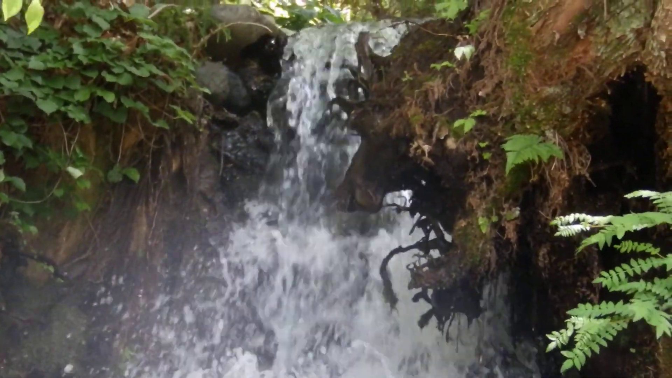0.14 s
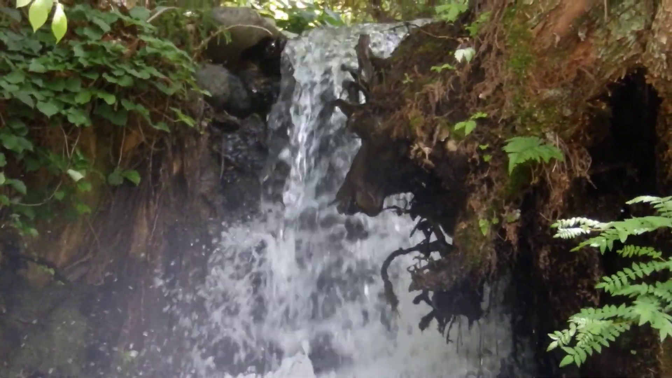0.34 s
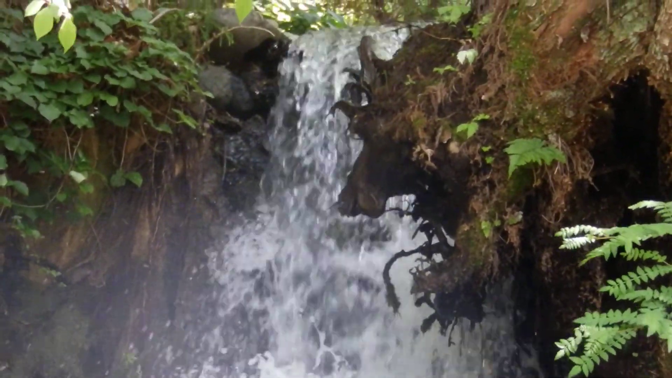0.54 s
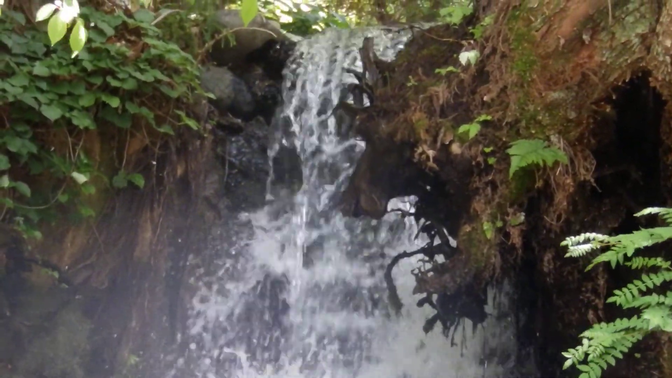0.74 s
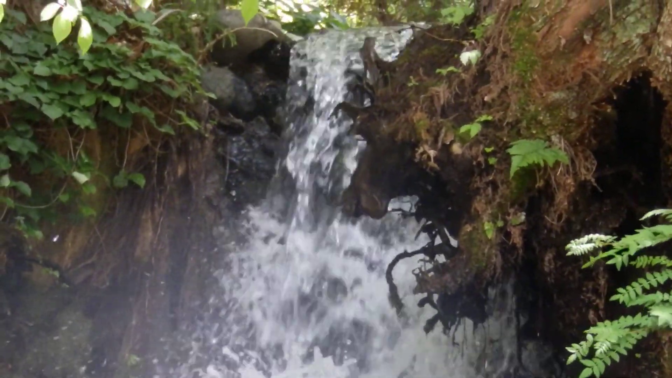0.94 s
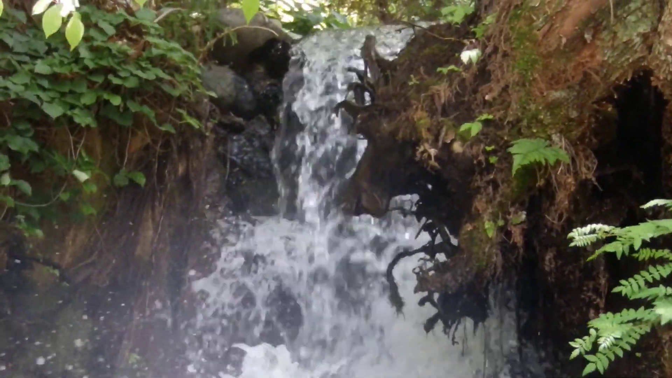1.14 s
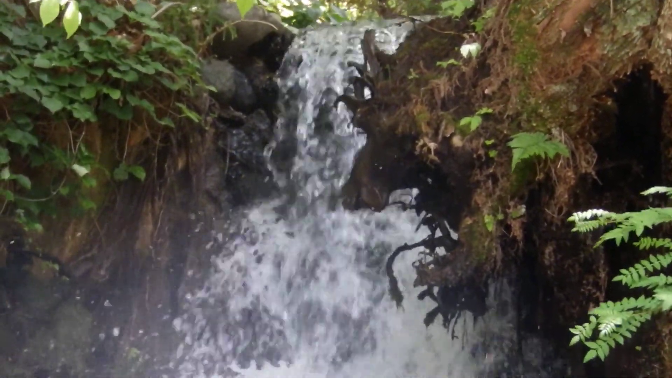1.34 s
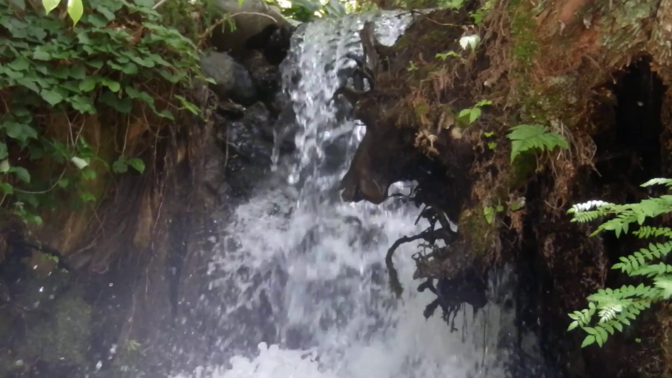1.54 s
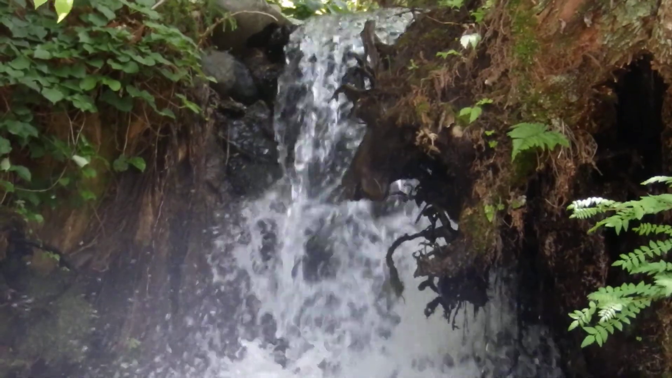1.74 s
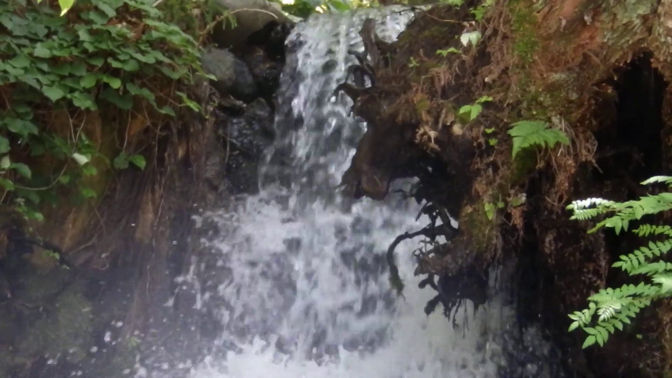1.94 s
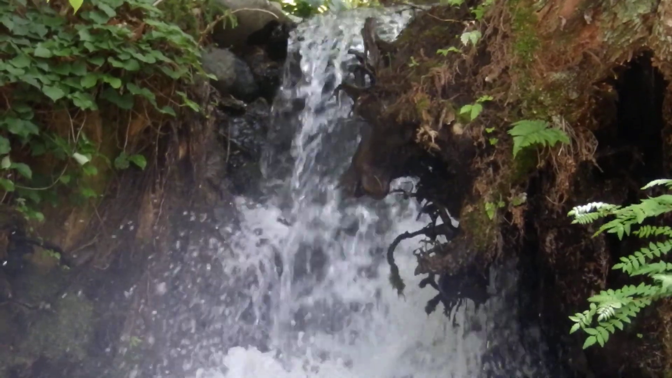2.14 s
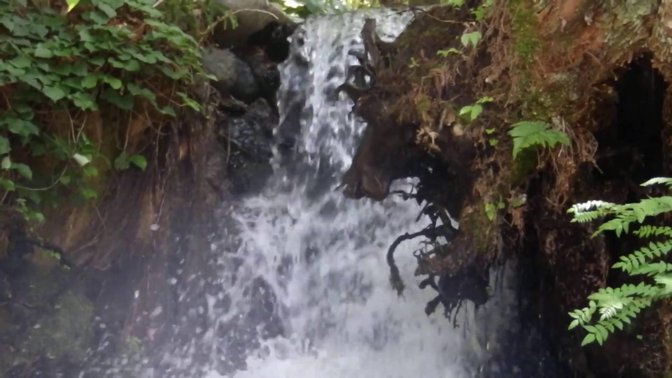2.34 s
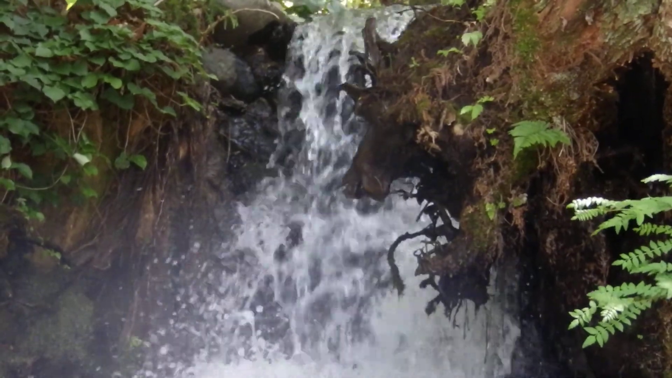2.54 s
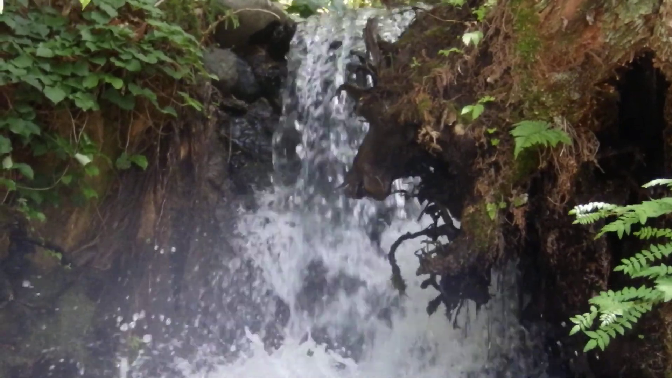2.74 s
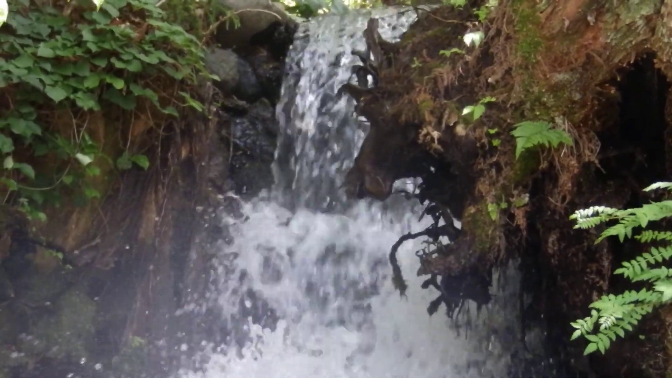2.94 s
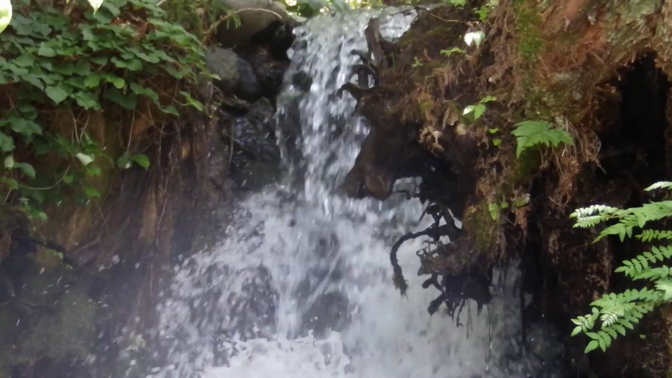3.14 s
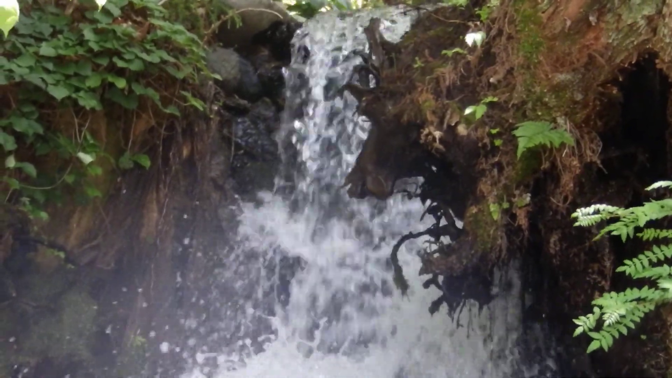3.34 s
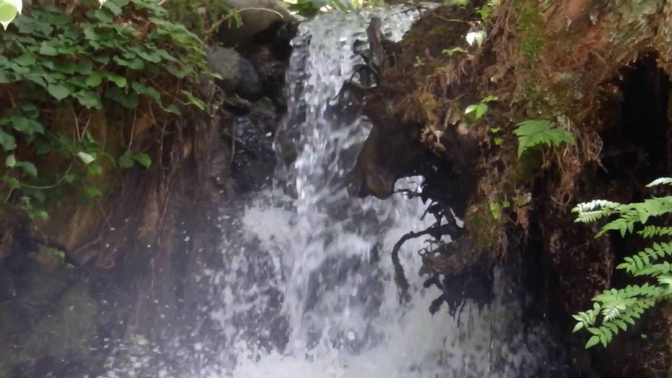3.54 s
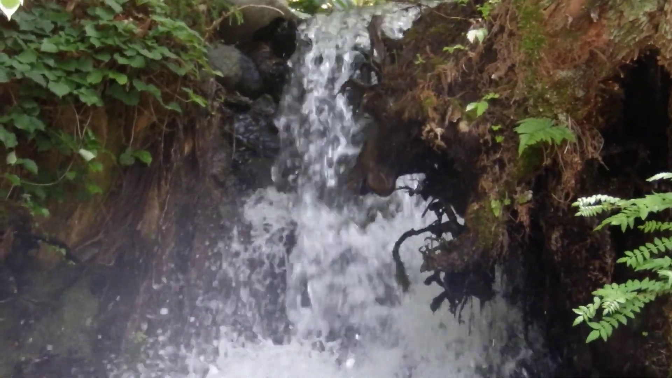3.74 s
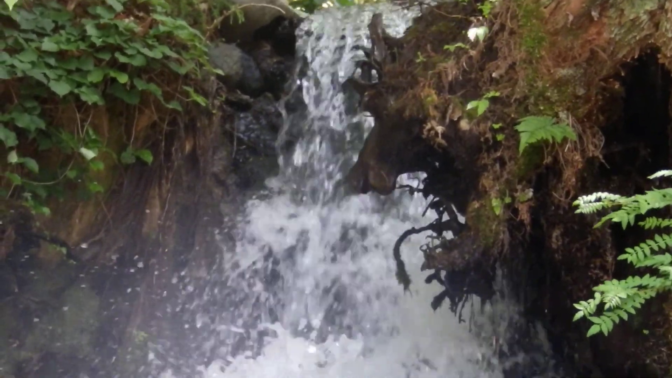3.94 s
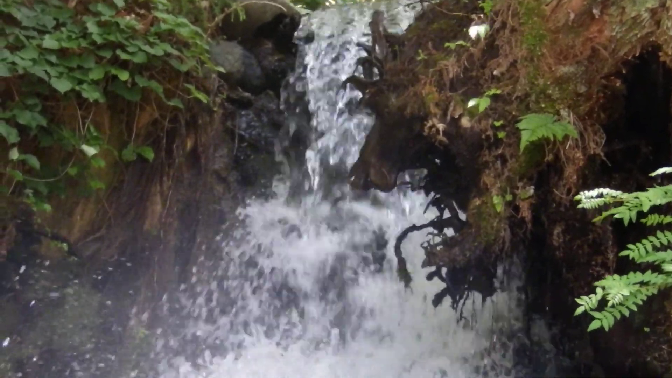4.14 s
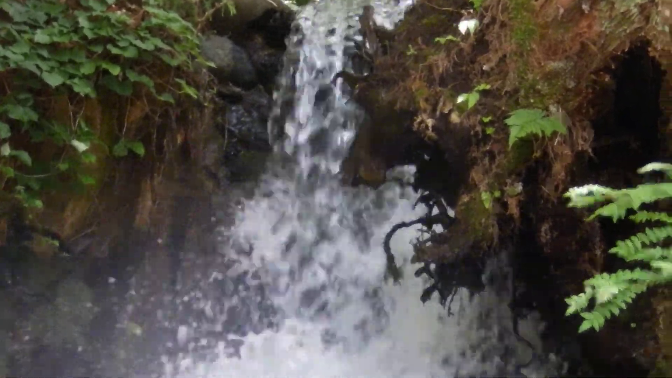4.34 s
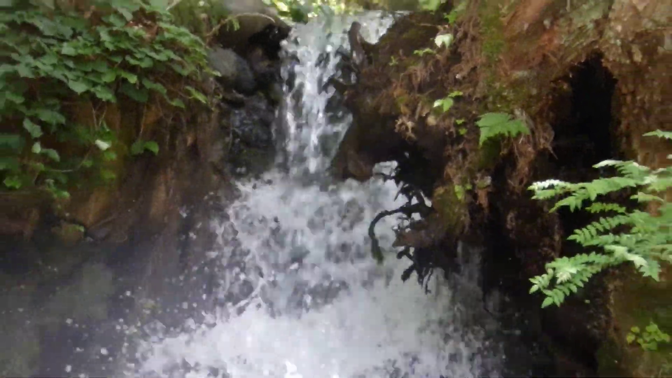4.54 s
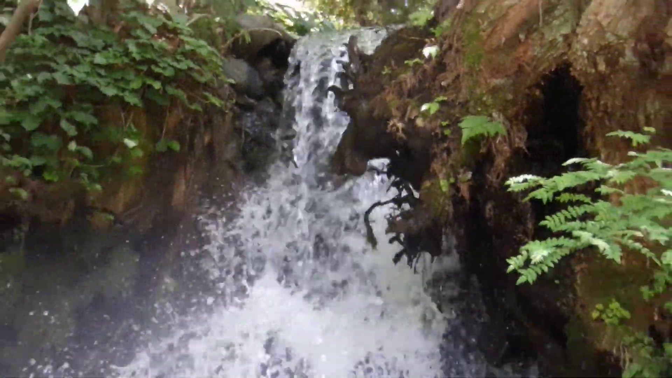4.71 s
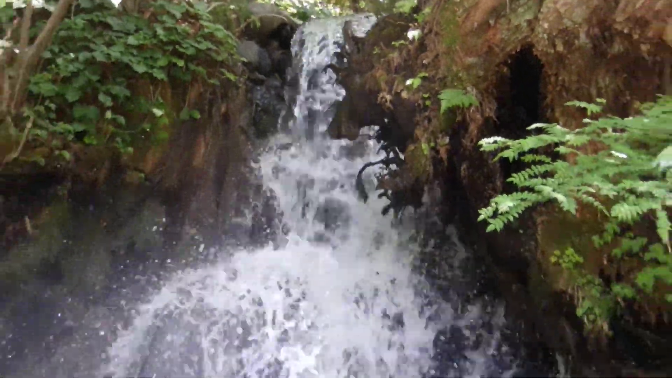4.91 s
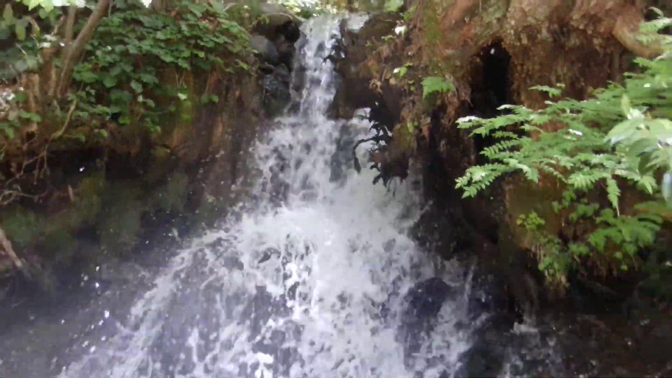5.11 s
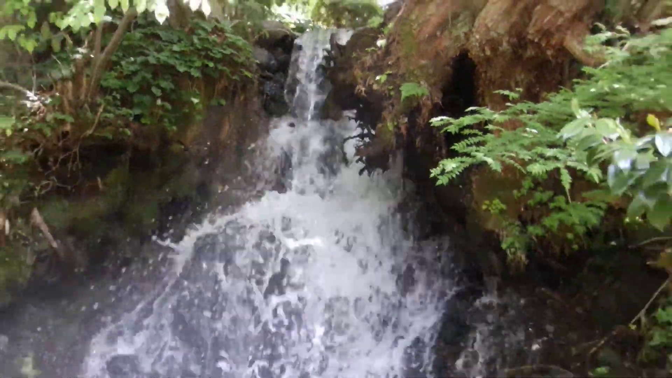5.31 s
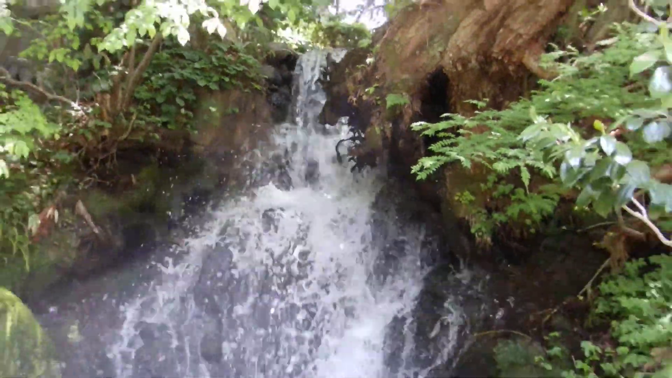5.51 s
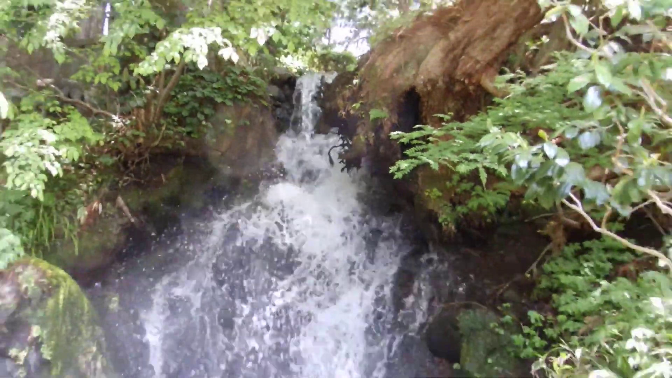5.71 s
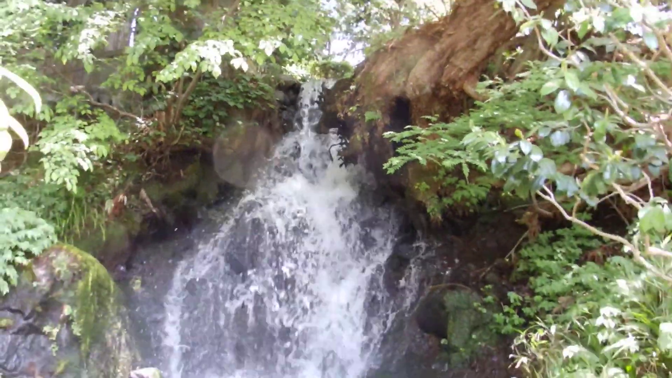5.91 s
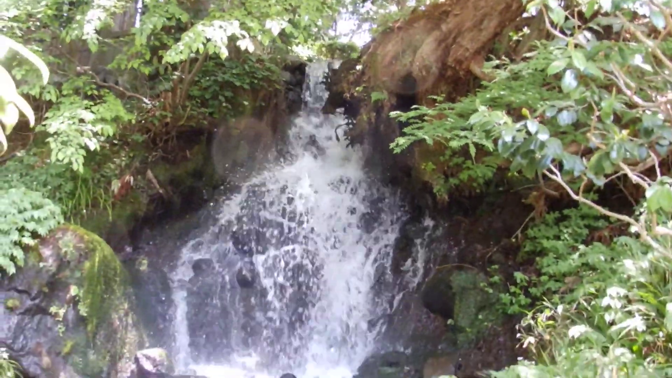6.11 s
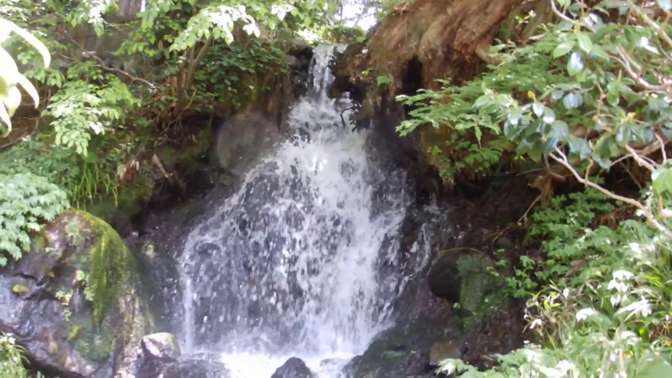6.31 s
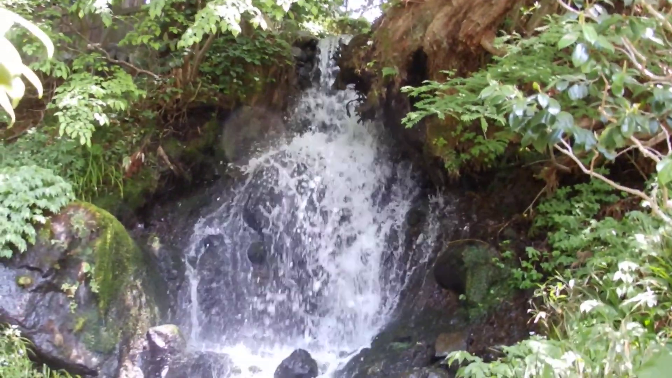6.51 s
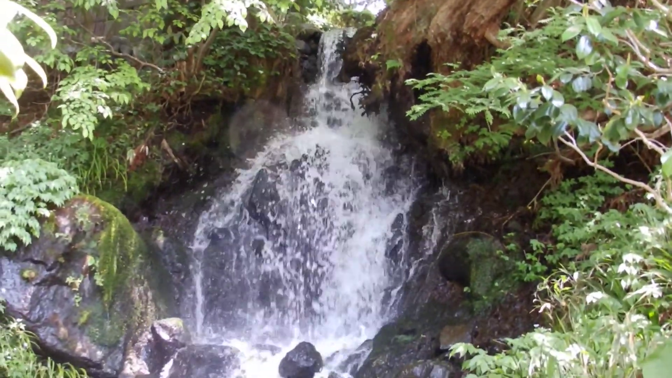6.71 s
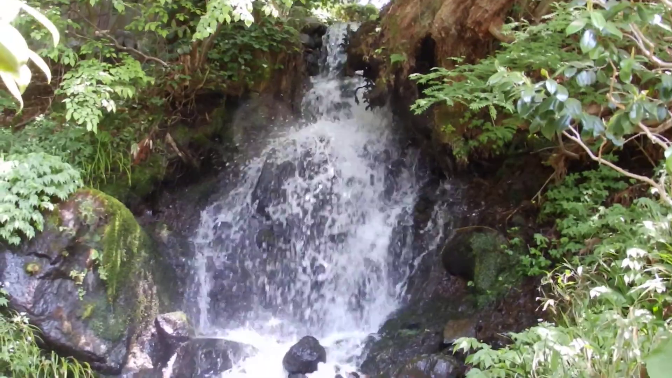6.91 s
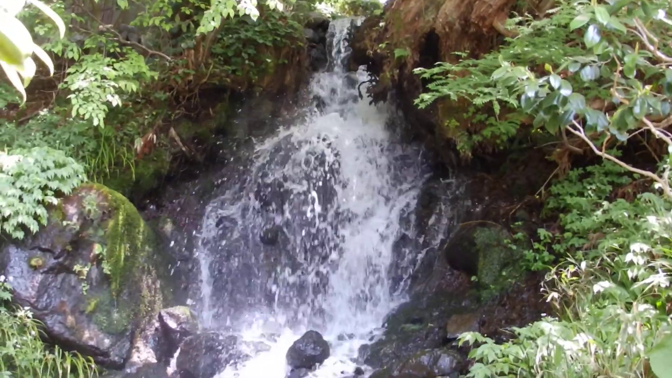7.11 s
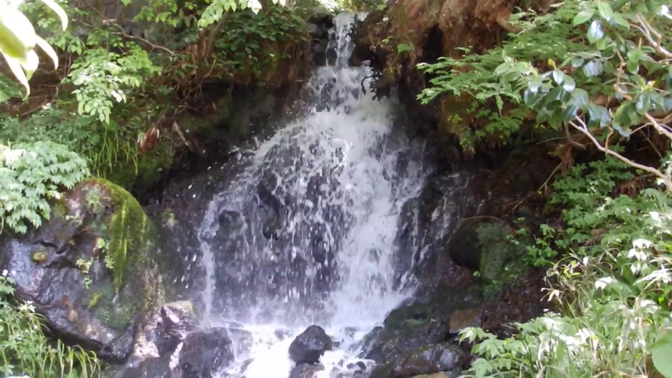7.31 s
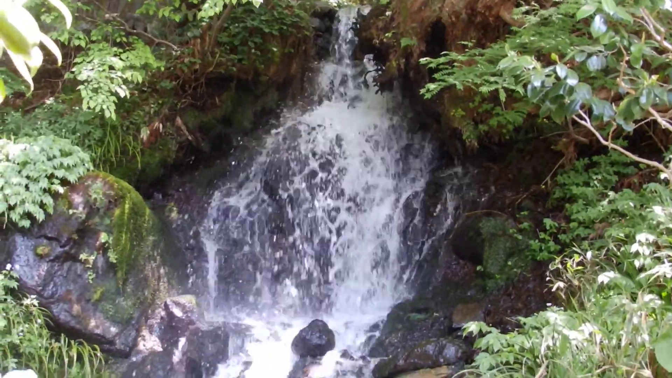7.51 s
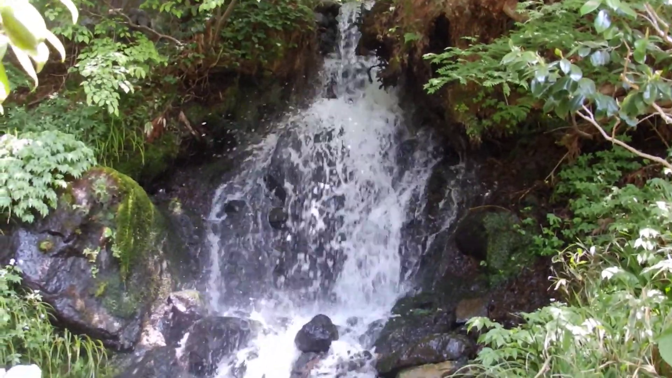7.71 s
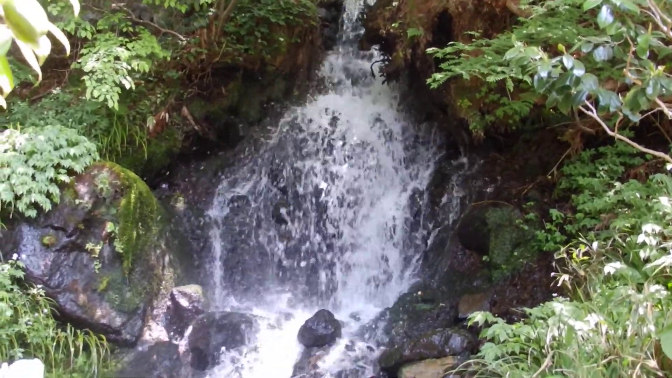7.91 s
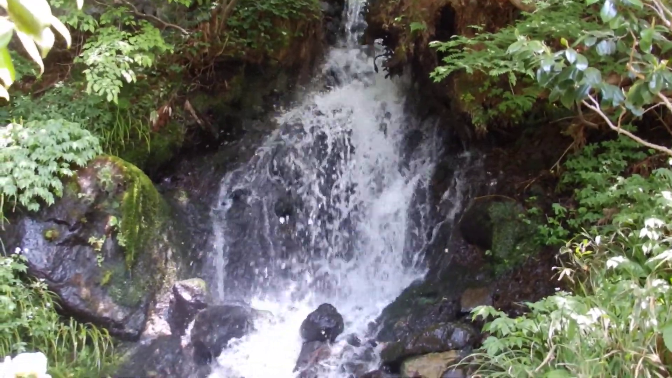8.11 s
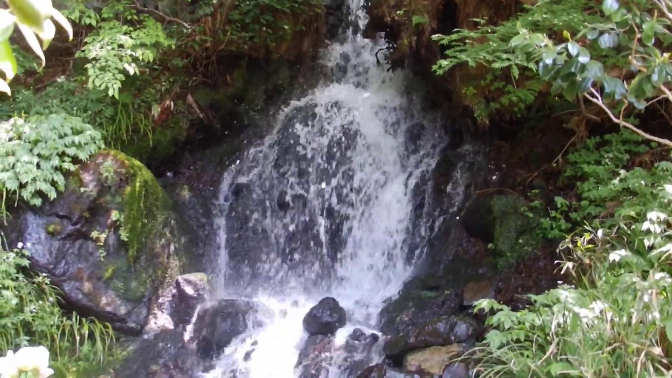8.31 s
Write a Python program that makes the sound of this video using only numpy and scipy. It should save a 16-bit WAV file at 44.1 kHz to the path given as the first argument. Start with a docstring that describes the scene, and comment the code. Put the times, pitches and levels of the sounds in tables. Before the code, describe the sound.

Water pours into a rock pool with gurgling and hissing spray, briefly going thin and muffled midway before filling out again.

```python
"""A rock pool under a small waterfall, the microphone a few metres off and facing the water.
The plunging jet roars and gurgles with bubbles; spray patters and hisses on the stone.
Heavier gushes come over the lip, and three single slaps of water stand out.
The level dips briefly here and there; for a second and a half the water sounds quieter and hollow."""
import sys
import numpy as np
from scipy import signal
from scipy.fft import rfft, irfft
from scipy.io import wavfile
from scipy.ndimage import uniform_filter1d

SR = 44100
rng = np.random.default_rng(int(sys.argv[2]) if len(sys.argv) > 2 else 0)


def output_pcm(signal):
    """Save a mono or channel-first signal as 16-bit PCM at the path in sys.argv[1].

    Samples are clipped to [-1, 1] before scaling.
    """
    pcm = np.clip(np.atleast_2d(signal).T, -1, 1) * 32767
    wavfile.write(sys.argv[1], SR, np.round(pcm).astype(np.int16))


N = 368676

# Spectrum of the churning pool from a few metres off: f/Hz, relative level/dB
POOL_SPECTRUM = [(20, -45), (52, -26.5), (95, -17.5), (170, -7.5), (215, -8.5), (265, -2), (345, -4.5),
                 (560, -1.7), (800, -0.5), (1050, -2.2), (1550, -2.5), (2000, -6.5), (2700, -10),
                 (7000, -32)]
# Faint resonances of the rock basin: f/Hz, Q, lift/dB
BASIN_RESONANCES = [(572, 23, 3), (674, 20, 2), (795, 24, 2), (960, 21, 2), (1230, 22, 1.5)]
def pool(flow_db, level_db=-28.5, bubble_db=-3, waver_db=0.3):
    """The jet drives a cloud of air under water: a roar, with single bubbles gurgling in it."""
    roar = churn(patchy_db=1.0, patch_s=0.053, patch_hz=450)
    gurgle = bubbles(low_hz=201, high_hz=3011, decay_cycles=5.9, rise=0.02, spread_db=1.0)
    water = colour(roar, POOL_SPECTRUM) + amp(bubble_db) * colour(gurgle, POOL_SPECTRUM)
    for hz, q, lift_db in BASIN_RESONANCES:
        water = bell(water, hz, q, lift_db)
    return amp(level_db + flow_db + waver_db * waver()) * unit(water)


def bubbles(low_hz, high_hz, decay_cycles, rise, spread_db, count=7000, size=1200):
    """Each trapped bubble rings for a few cycles and rises in pitch as it nears the surface."""
    when, pitch, rarity = rng.random((count, 3)).T[:, :, None]
    hz = low_hz + (high_hz - low_hz) * pitch ** 2
    cycles = hz * np.arange(size) / SR
    age = cycles / decay_cycles
    strength_db = -spread_db * np.log(np.maximum(rarity, 0.01))
    height = np.sqrt(hz * pitch) * amp(strength_db)
    rings = height * np.exp(-age) * np.sin(2 * np.pi * cycles * (1 + rise * age))
    at = (when * N).astype(int) + np.arange(size)
    return unit(np.bincount(at.ravel(), rings.ravel(), N)[:N])


# Spectrum of the spray on the rock face, from the same spot: f/Hz, relative level/dB
SPRAY_SPECTRUM = [(300, -31), (1400, -1), (2050, -6.5), (2450, 1), (2850, 0.5), (3400, -2), (4500, -0.55),
                  (5400, -3.5), (7200, -13.5), (8200, -17), (10000, -13), (12000, -10), (14000, -15),
                  (15800, -17)]
def spray(flow_db, level_db=-26.5, drop_db=-4.5, waver_db=0.35, flutter_db=0.31, flutter_s=0.008):
    """Mist hisses on the rock and drops patter through it; both flutter as the sheet of water tears."""
    hiss = churn(patchy_db=1.0, patch_s=0.02, patch_hz=1500)
    patter = amp(drop_db) * drops(per_s=6000, spread_db=3.0)
    flutter = unit(uniform_filter1d(rng.standard_normal(N), round(flutter_s * SR)))
    gain = amp(level_db + flow_db + waver_db * waver() + flutter_db * flutter)
    return gain * colour(hiss + patter, SPRAY_SPECTRUM)


def drops(per_s, spread_db):
    """Sharp ticks of drops on wet stone: many small, a few large."""
    height = amp(spread_db * np.minimum(rng.exponential(1, N), 4.5))
    polarity = rng.choice([-1, 1], N)
    lands = rng.random(N) < per_s / SR
    return unit(height * polarity * lands)


# Single slaps that reach the microphone above the roar: t/s, peak level/dB, decay/s, centre f/Hz
WATER_SLAPS = [(3.741, -20, .002, 1700), (7.354, -14, .0006, 2000), (7.514, -15, .007, 1000)]
def slaps(size=1500):
    """A lump of water hits stone: a short burst, two octaves wide, that dies at once."""
    out, t = np.zeros(N), np.arange(size) / SR
    for start_s, peak_db, decay_s, hz in WATER_SLAPS:
        band = signal.butter(2, [hz / 2, hz * 2], "band", fs=SR)
        burst = signal.lfilter(*band, rng.standard_normal(size) * np.exp(-t / decay_s))
        out[round(start_s * SR):][:size] += amp(peak_db) * burst / abs(burst).max()
    return out


# Gushes over the lip of the fall: crest t/s, length/s, pool gain/dB, spray gain/dB
LIP_GUSHES = [(0.253, .16, 0.5, 1), (.81, .1, 0.5, 1), (1.147, .26, 2.2, 0.1), (2.02, 0.69, 1.7, 0.3),
              (2.726, .18, 0.5, 1.6), (3.698, 0.15, 2, 1.3), (4.138, 0.23, 1.7, .9), (4.7, 0.18, -0.7, 1.4),
              (5.02, .24, .6, 1.5), (5.66, .35, 1.8, 1.0), (6.617, 0.34, 1.5, 0), (7.012, .12, 1, 2.5),
              (7.168, .1, 3.3, 0), (7.68, 0.14, 1.3, .9)]
def pour(waver_db=0.23):
    """The flow to pool and spray, in dB: each gush swells and ebbs over a shared waver."""
    t = np.arange(N) / SR
    flow_db = np.zeros((2, N)) + waver_db * waver()
    for crest_s, length_s, pool_db, spray_db in LIP_GUSHES:
        during = abs(t - crest_s) < length_s / 2
        hump = np.cos(np.pi * (t[during] - crest_s) / length_s) ** 2
        flow_db[:, during] += np.outer([pool_db, spray_db], hump)
    return flow_db


def waver(slowest_hz=3, fastest_hz=14, count=30):
    """The unsteadiness of the pour: a random wobble with an rms of 1."""
    t = np.linspace(0, N / SR, 2000)
    rates = np.geomspace(slowest_hz, fastest_hz, count)[:, None]
    phases = rng.random((count, 1))
    sines = np.sin(2 * np.pi * (rates * t + phases)) / np.sqrt(rates)
    return unit(np.interp(np.arange(N) / SR, t, sines.sum(0)))


def churn(patchy_db, patch_s, patch_hz, size=256):
    """White noise that swells and sinks in small patches of time and pitch."""
    hop = size // 4
    real, imag, patches = rng.standard_normal((3, N // hop + 5, size // 2 + 1))
    patches = uniform_filter1d(patches, round(patch_s * SR / hop), axis=0)
    patches = uniform_filter1d(patches, round(patch_hz * size / SR), axis=1)
    spectra = (real + 1j * imag) * amp(patchy_db * unit(patches))
    _, noise = signal.istft(spectra.T, nperseg=size, noverlap=size - hop)
    return unit(noise[:N])


# How hollow the water sounds at the microphone: t/s, share (0 to 1)
HOLLOW_SHARE = [(4.322, 0), (4.5, 1), (5.854, 1), (6.044, 0)]
# Broad troughs that make it hollow: f/Hz, Q, gain/dB
HOLLOW_TROUGHS = [(275, 0.16, -10.5), (2236, 0.91, -20), (8030, 0.28, -21)]
def hollowed(x):
    """The water turns thin and quiet, then fills out again."""
    thin = x
    for hz, q, gain_db in HOLLOW_TROUGHS:
        thin = bell(thin, hz, q, gain_db)
    return x + curve(HOLLOW_SHARE) * (thin - x)


# Brief dips in level at the microphone: t/s, depth/dB
LEVEL_DIPS = [(1.0, 1), (1.61, 1.5), (2.24, 2.4), (3.055, 2), (3.188, 2.5), (3.423, 1.5), (3.746, 2),
              (4.747, 1.2), (5.097, 5.0), (6.09, 0), (7.357, 3), (8.115, 1.1)]
def dips(fall_s=0.006, length_s=0.15):
    """A gain that falls quickly at each dip and creeps back."""
    cuts_db = [curve([(s, 0), (s + fall_s, depth_db), (s + length_s, 0)]) for s, depth_db in LEVEL_DIPS]
    return amp(-sum(cuts_db))


def colour(x, spectrum):
    """Shapes a sound by (f/Hz, level/dB) points joined on a log-frequency axis, to an rms of 1."""
    hz, level_db = np.transpose(spectrum)
    bin_hz = np.fft.rfftfreq(N, 1 / SR)
    gain_db = np.interp(np.log(bin_hz + 1), np.log(hz), level_db)
    return unit(irfft(rfft(x) * amp(gain_db), N))


def bell(x, hz, q, gain_db):
    """Lifts or cuts one band."""
    w = 2 * np.tan(np.pi * hz / SR)
    b, a = signal.bilinear([1, amp(gain_db) * w / q, w * w], [1, w / q, w * w])
    return signal.lfilter(b, a, x)


def curve(points):
    """Joins (t/s, value) points with straight lines, at every sample."""
    return np.interp(np.arange(N) / SR, *np.transpose(points))


def amp(db):
    """Decibels to gain."""
    return 10 ** (np.asarray(db) / 20)


def unit(x):
    """Scales to an rms of 1."""
    return x / np.sqrt(np.mean(x ** 2) + 1e-20)


def scene():
    """One pour feeds pool and spray, straight ahead of the microphone and alike in both channels."""
    pool_db, spray_db = pour()
    water = pool(pool_db) + spray(spray_db) + slaps()
    return np.array([water, water])


def record(dry, notch_hz=15000, cutoff_hz=15850):
    """At the microphone: the hollow stretch and the dips, then a narrow treble notch and a low-pass."""
    notch = signal.iirnotch(notch_hz, Q=22, fs=SR)
    lowpass = signal.firwin(801, cutoff_hz, window=("kaiser", 9), fs=SR)
    sound = signal.lfilter(*notch, hollowed(dry) * dips())
    return signal.oaconvolve(sound, lowpass[None], "same", axes=1)


dry = scene()
out = record(dry)
output_pcm(out)
```